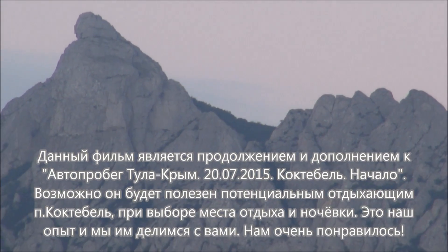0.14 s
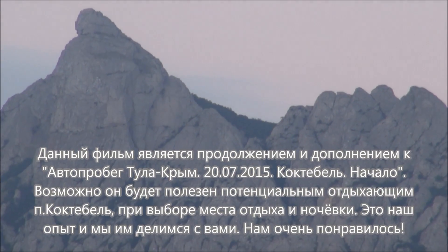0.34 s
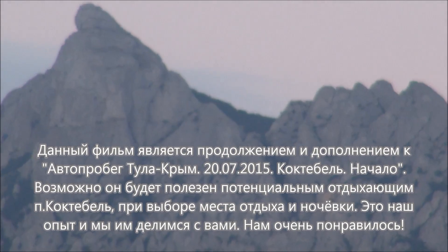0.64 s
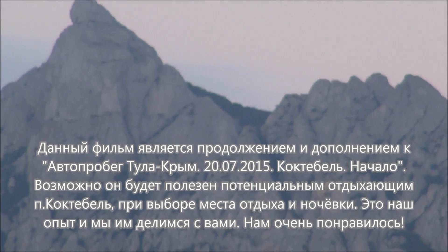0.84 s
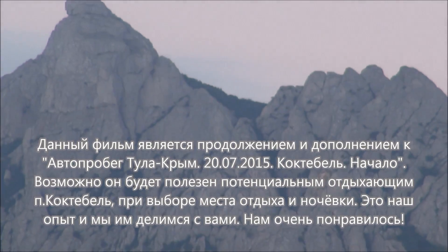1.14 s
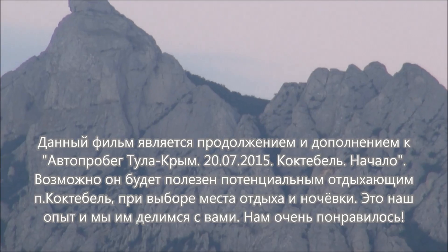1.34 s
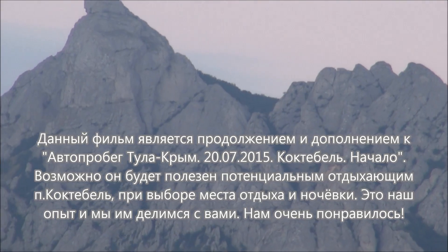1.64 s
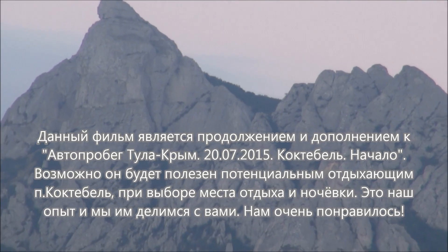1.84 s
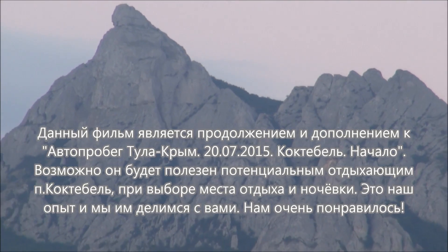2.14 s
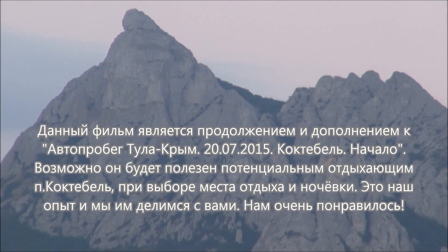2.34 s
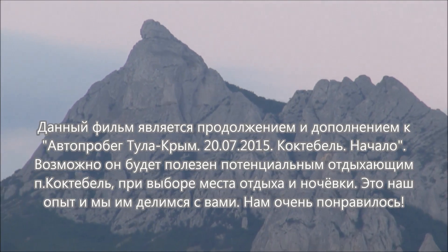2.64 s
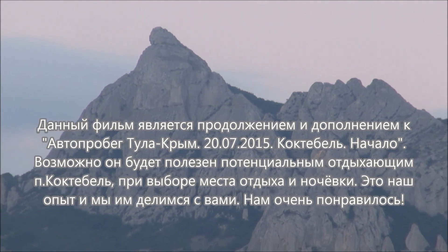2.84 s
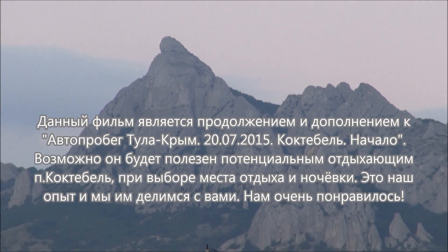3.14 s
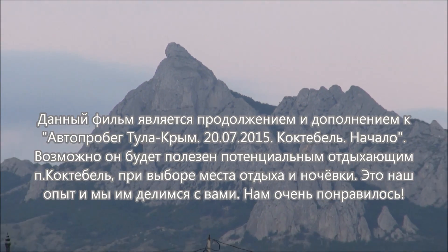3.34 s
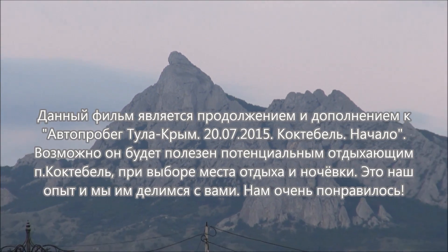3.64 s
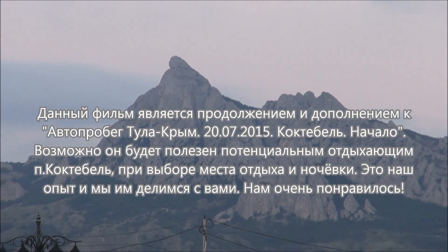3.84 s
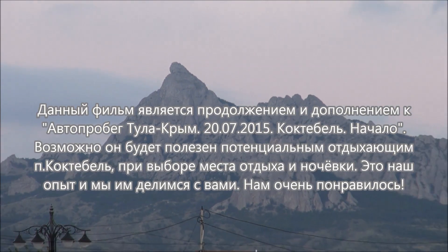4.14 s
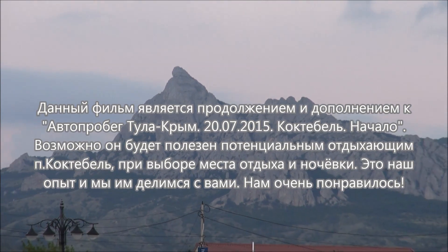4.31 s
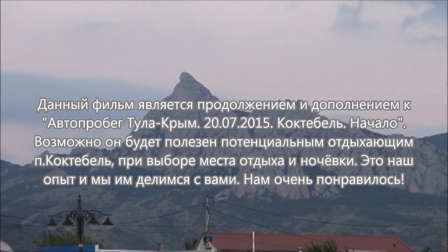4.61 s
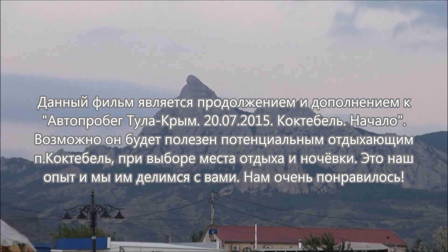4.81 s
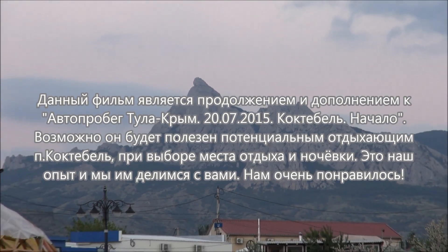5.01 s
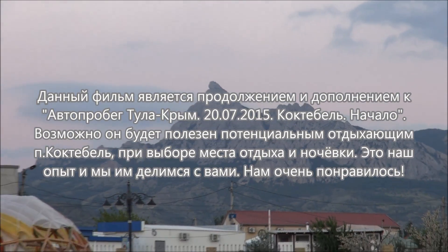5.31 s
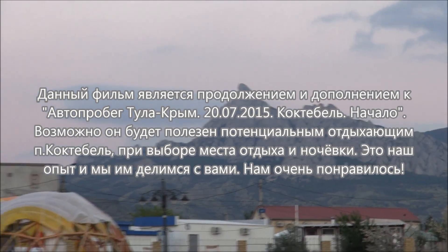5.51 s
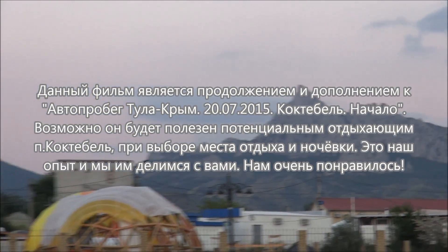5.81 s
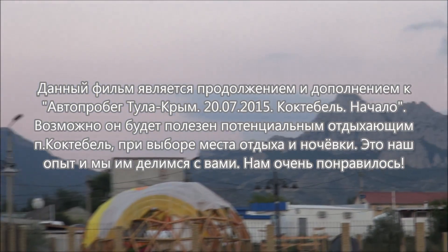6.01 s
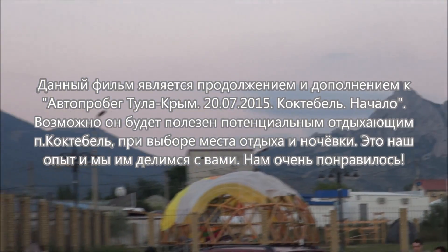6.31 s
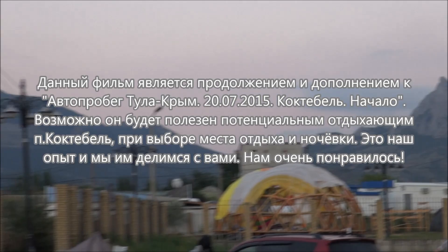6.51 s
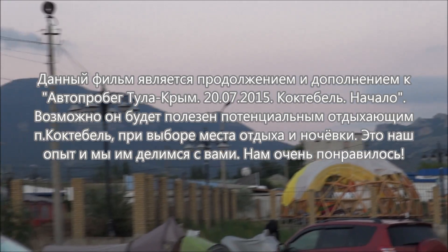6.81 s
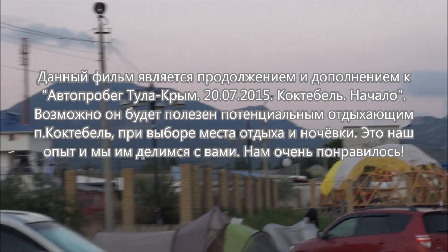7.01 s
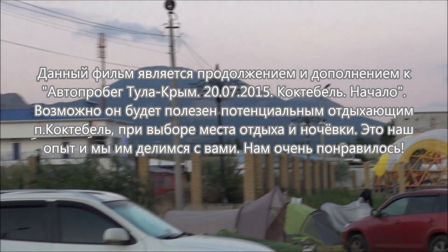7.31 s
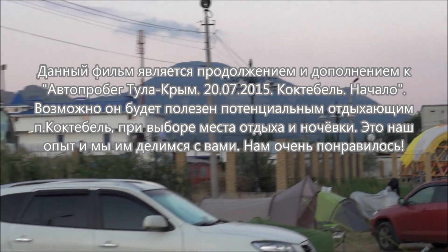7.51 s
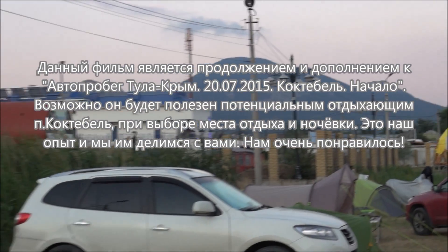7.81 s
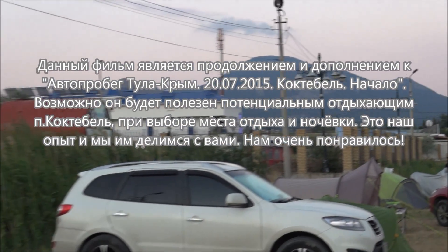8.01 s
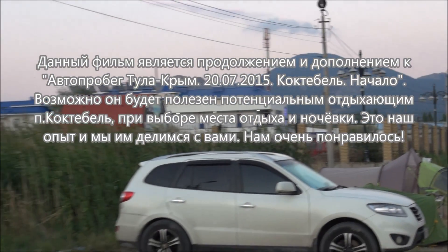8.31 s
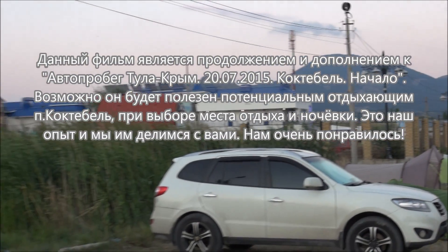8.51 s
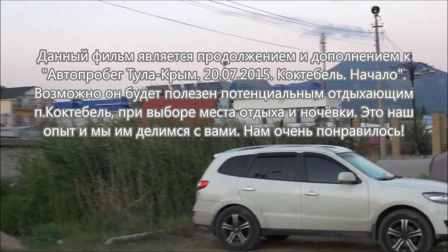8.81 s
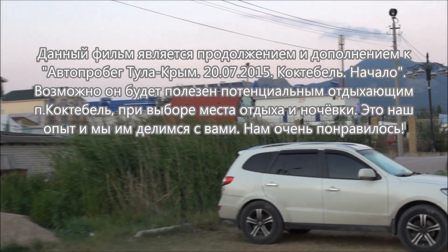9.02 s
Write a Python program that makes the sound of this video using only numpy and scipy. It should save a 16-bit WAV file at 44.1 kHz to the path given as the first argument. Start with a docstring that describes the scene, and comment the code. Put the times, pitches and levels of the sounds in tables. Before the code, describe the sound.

Lumpy low wind roar comes in broken bursts, then grows nearly continuous, with thin quick swallow calls and a distant twittering flock behind it.

```python
"""A lumpy low roar comes first: gusty wind over the two close ports of a small camera microphone at a camp.
The roar is noise shaped in half-octave bands, brighter as it grows louder; single eddies add
thumps and short bright rustles. A swallow whistles a four-note call near by, others chirp hooked notes,
and a far flock twitters, all blurred by scattered echoes. Underneath lies a smooth noise hiss
of surroundings and preamplifier that sinks after the strongest gusts and creeps back."""
import sys
import numpy as np
from scipy import signal
from scipy.fft import rfft, irfft, next_fast_len
from scipy.io import wavfile
from scipy.ndimage import uniform_filter1d, minimum_filter1d

SR = 44100
rng = np.random.default_rng(int(sys.argv[2]) if len(sys.argv) > 2 else 0)


def to_wav(s):
    """Save 16-bit WAV."""
    ch = np.atleast_2d(s).T  # columns
    pcm = np.round(np.clip(ch, -1, 1) * 32767)  # PCM
    wavfile.write(sys.argv[1], SR, pcm.astype(np.int16))


N = 403515


def from_db(db):
    """Decibels to amplitude gain."""
    return 10 ** (np.asarray(db) / 20)


def rms_one(x):
    """Scales a signal to an rms of 1."""
    return x / np.sqrt(np.mean(x ** 2) + 1e-20)


def in_time(rows):
    """Draws each value column of a timed table as a curve, sample by sample."""
    times_s, *columns = np.transpose(rows)
    return [np.interp(np.arange(N) / SR, times_s, column) for column in columns]


def at_hz(points, hz):
    """Reads a spectrum table on a log-frequency axis."""
    points_hz, values = np.transpose(points)
    return np.interp(np.log(hz), np.log(points_hz), values)


def drift(corner_hz):
    """Slow random wander of rms 1: noise at every 20th sample through two equal one-pole low-passes."""
    pole = np.exp(-2 * np.pi * corner_hz * 20 / SR)
    noise = rng.standard_normal(N // 20 + 4002)
    slow = signal.lfilter([1], [1, -2 * pole, pole * pole], noise)[4000:]  # drop the filter's start-up
    return np.interp(np.arange(N) / 20, np.arange(len(slow)), rms_one(slow))


def panned(x, pan_db):
    """Spreads a sound over two channels, the left louder than the right by pan_db."""
    return np.outer(from_db([pan_db / 2, -pan_db / 2]), x)


def coloured(x, points):
    """Tints the spectrum of x with a table and returns it with its frequency axis."""
    size = next_fast_len(N)
    hz = np.maximum(np.fft.rfftfreq(size, 1 / SR), 1)
    return rfft(x, size) * from_db(at_hz(points, hz)), hz


def to_time(spectrum):
    """Turns spectra back into sound of the scene's length."""
    return irfft(spectrum, next_fast_len(N))[..., :N]


# Level of the wind roar as heard, before flutter and band changes: time_s, roar_db
GUSTS = [(0.0, -42.5), (0.18, -33.5), (0.38, -49), (0.51, -23), (0.64, -30), (0.66, -33), (0.71, -37.5),
         (0.76, -30.5), (0.92, -40), (0.97, -32), (1.22, -53.5), (1.5, -54), (1.68, -28.5), (1.91, -71),
         (2.14, -65.5), (2.27, -24), (2.6, -39.5), (2.78, -32.5), (2.85, -51.5), (2.9, -33), (3.0, -24),
         (3.11, -37.5), (3.16, -30.5), (3.18, -50), (3.24, -33), (3.49, -53), (3.64, -27.5), (3.72, -39),
         (3.77, -19.5), (4.13, -28), (4.3, -39.5), (4.56, -21.5), (4.71, -22), (4.74, -21.5), (4.87, -28),
         (5.2, -20.5), (5.3, -26.5), (5.35, -25), (5.68, -28), (6.19, -21), (6.39, -28), (6.5, -26),
         (6.75, -34), (6.93, -25), (7.26, -35), (7.31, -25.5), (7.39, -39), (7.42, -32), (7.54, -24.5),
         (7.62, -30), (7.85, -27), (7.87, -37.5), (8.03, -41), (8.18, -30.5), (8.46, -31), (8.82, -27),
         (8.87, -39), (8.97, -31.5), (9.07, -25.5), (9.15, -32.5)]
USUAL_ROAR_DB = -25
FLUTTER_DB, FLUTTER_CORNER_HZ = 1.0, 16
MORE_FLUTTER_PER_DB = .12  # dB more flutter per dB that the roar is below usual


def gusts():
    """Follows the roar level with a random flutter that deepens as the roar falls below usual."""
    gust_db, = in_time(GUSTS)
    flutter_db = FLUTTER_DB + MORE_FLUTTER_PER_DB * np.maximum(USUAL_ROAR_DB - gust_db, 0)
    return gust_db + flutter_db * drift(FLUTTER_CORNER_HZ)


# Single eddies striking a port, levels before the trims below: time_s, peak_db, bright_edge_db
PUFFS = [(0.496, -13, -68), (0.589, -13.5, -40), (0.658, -11, -51), (2.226, -14.5, -47), (2.25, -8, -36),
         (2.284, -30, -42), (2.328, -8, -31), (2.372, -13.5, -53), (2.652, -37, -62), (2.74, -13.5, -62),
         (2.984, -17, -48), (3.137, -12.5, -54), (3.744, -36, -49), (3.765, -4, -40), (3.858, -21, -32),
         (3.936, -4.5, -39), (4.092, -16, -44), (4.515, -18, -53), (4.753, -29, -52), (5.199, -5, -49),
         (5.911, -14.5, -42), (6.031, -6, -34), (6.164, -16, -45), (6.199, -10, -32.5), (6.92, -22, -42),
         (7.319, -10, -53), (7.466, -30.5, -53), (7.83, -10.5, -64), (8.179, -13, -65), (8.991, -32, -45)]


def after_puffs(db, fade_s):
    """An envelope that jumps at each puff and fades exponentially; fade_s near zero leaves clicks."""
    strikes = np.zeros(N)
    strikes[[round(row[0] * SR) for row in PUFFS]] = from_db(db)
    return signal.lfilter([1], [1, -np.exp(-1 / (fade_s * SR))], strikes + 1e-18)


# Roar at usual brightness, rescaled as a whole: frequency_hz, density_db (per Hz)
ROAR = [(15, -68), (25, -53), (48, -26), (100, -10), (146, -4), (318, 1), (413, -2.5), (604, -8),
        (753, -14), (958, -19), (3000, -53), (3900, -66), (6600, -120)]
# What differs between the ports, against the shared roar: frequency_hz, level_db
ROAR_APART = [(30, -9), (100, -42), (300, -46), (800, -21.5), (2000, -44)]
# Share of the power that comes in lumps: frequency_hz, power_share (0 to 1)
LUMPY_SHARE = [(40, 0.78), (125, 0.41), (300, 0.79), (600, 0.89)]


def eddy_pressure(roar_db, lump_db, puff_s, puff_crest_db, slap_db):
    """Mixes lumpy and smooth turbulence; returns shared and differing spectra with their Hz axis."""
    peak_db = np.array(PUFFS)[:, 1]
    # Dividing by the roar gain keeps puffs independent of the roar level applied later.
    puffs = after_puffs(peak_db - puff_crest_db, puff_s) / from_db(roar_db)
    lumps = rms_one(from_db(lump_db * drift(50.0)))
    force = np.hypot(lumps, puffs)  # puffs add their power to the gust's
    lumpy, apart, smooth = rng.standard_normal((3, N))
    # Each puff opens with one pressure kick of random sign.
    kicks = after_puffs(peak_db + slap_db, 1e-6) / from_db(roar_db) * np.sign(apart)
    noises = np.array([lumpy * force + kicks, apart * force, smooth])
    (lumpy, apart, smooth), hz = coloured(noises, ROAR)
    share = np.clip(at_hz(LUMPY_SHARE, hz), 0, 1)
    shared = np.sqrt(share) * lumpy + np.sqrt(1 - share) * smooth
    return np.array([shared, from_db(at_hz(ROAR_APART, hz)) * apart]), hz


# Slow change of the upper roar beyond the level rule: time_s, brightness_db
BRIGHTNESS = [(0, -7.5), (.45, -5), (.8, -2), (1.2, -3), (1.7, -8.5), (2.3, 5), (2.6, -1.5), (3.0, -4.5),
              (3.2, -5.5), (3.8, -1), (4.8, -3), (5.6, -1.5), (6.3, 3), (6.8, 2.5), (7.2, 3.5), (7.9, 1.5),
              (8.3, 3), (9.15, 2)]
BRIGHTER_PER_DB = 0.4041  # dB of brightness per dB of roar above usual
# How far each pitch region follows the brightness: frequency_hz, share (dB per dB)
BRIGHTENING = [(30, -1), (100, -0.87), (300, 0.12), (800, 1.21), (1600, 1.44), (3000, 0.57)]
# The weight of the roar's lows changes slowly: time_s, lows_db
LOWS = [(0, -10), (.7, -2), (1.3, -1), (1.9, -3), (2.3, 22), (2.8, -6.5), (3.3, 1), (4.8, -6.5),
        (6.1, -0.5), (6.7, -6.5), (8.2, -2.5), (9.15, -6)]
# How far each pitch region follows that weight: frequency_hz, share (dB per dB)
LOWS_SHARE = [(60, 0.7), (120, 0.63), (250, 0.014)]
# Stereo lean of the shared roar: frequency_hz, left_minus_right_db
ROAR_BALANCE = [(40, -.6), (170, -1.2), (300, -2.9), (480, -4.4), (700, -1.3), (1000, 1.3), (2000, .1)]


def wind(lump_db, own_db, puff_s, puff_crest_db, slap_db):
    """Plays eddy pressure in half octaves that follow level, brightness, low weight and their own wander."""
    roar_db = gusts()
    brightness_db = in_time(BRIGHTNESS)[0] + BRIGHTER_PER_DB * (roar_db - USUAL_ROAR_DB)
    lows_db, = in_time(LOWS)
    spectra, hz = eddy_pressure(roar_db, lump_db, puff_s, puff_crest_db, slap_db)
    out = np.zeros((2, N))
    for centre_hz in 25 * 2 ** np.arange(0, 8, .5):
        octaves_off = np.log2(hz / centre_hz)
        overlap = np.cos(np.pi * np.clip(octaves_off, -.5, .5)) ** 2  # neighbours add up to one
        shared, apart = to_time(spectra * overlap)
        band = panned(shared, at_hz(ROAR_BALANCE, centre_hz)) + np.outer([1, -1], apart)
        change_db = at_hz(BRIGHTENING, centre_hz) * brightness_db
        change_db += at_hz(LOWS_SHARE, centre_hz) * lows_db
        out += band * from_db(roar_db + change_db + own_db * drift(3.8))
    usual_rms = np.sqrt(np.mean(from_db(at_hz(ROAR, hz)) ** 2))
    return out / usual_rms


# Colour of a puff's bright edge, rescaled as a whole: frequency_hz, density_db (per Hz)
EDGE = [(700, -21), (1300, 10.5), (2000, -1), (3200, -15.5), (5000, -24), (8000, -52)]


def puff_edges(fade_s, gain_db):
    """Each puff tears a short bright noise rustle off the rim of the port."""
    spectrum, _ = coloured(rng.standard_normal(N), EDGE)
    rustle = rms_one(to_time(spectrum))
    edge_db = np.array(PUFFS)[:, 2] + gain_db
    softened = uniform_filter1d(after_puffs(edge_db, fade_s), size=130)  # about 3 ms
    return panned(rustle * softened, .3)


# Second partial against the first, before a note's own offset: pitch_hz, level_db
OCTAVE = [(1600, 16), (2300, 3.5), (2900, -1.5), (3300, -19), (3800, -21), (5000, -30)]


def whistle(rows, octave_db=0):
    """A gliding sine along (time_s, pitch_hz, level_db) rows, with its octave and rounded ends."""
    times_s, pitches_hz, levels_db = np.transpose(rows)
    t = np.arange(times_s[0], times_s[-1], 1 / SR)
    pitch_hz = uniform_filter1d(np.interp(t, times_s, pitches_hz), size=25)
    phase = 2 * np.pi * np.cumsum(pitch_hz) / SR
    octave_gain = from_db(at_hz(OCTAVE, pitch_hz) + octave_db)
    tone = np.sin(phase) + octave_gain * np.sin(2 * phase)
    level = from_db(np.interp(t, times_s, levels_db))
    return tone * level * signal.windows.tukey(len(t), .2)


def add(out, sound, start_s, level_db, pan_db):
    """Mixes a sound in at its start time."""
    i = round(start_s * SR)
    out[:, i:i + len(sound)] += from_db(level_db) * panned(sound, pan_db)[:, :N - i]


SHOULDER_S, DIP_S, TOP_S, END_S = .0075, .0098, .013, .0172  # times within a note
DIP_SHARE, END_SHARE = .3, .15  # of the climb to the shoulder, of the whole span
START_DB, SHOULDER_DB, END_DB = -11, -3, -9  # against the top


def call_note(start_hz, shoulder_hz, top_hz):
    """A whistle that climbs to a shoulder, sags a little, flicks to the top and drops."""
    dip_hz = shoulder_hz - DIP_SHARE * (shoulder_hz - start_hz)
    end_hz = start_hz + END_SHARE * (top_hz - start_hz)
    return whistle([(0, start_hz, START_DB),
                    (SHOULDER_S, shoulder_hz, SHOULDER_DB),
                    (DIP_S, dip_hz, SHOULDER_DB),
                    (TOP_S, top_hz, 0),
                    (END_S, end_hz, END_DB)])


# The near swallow's four notes: start_hz, shoulder_hz, top_hz, level_db (against the call)
CALL = [(1700, 2450, 3050, -12), (2650, 3600, 5100, 0), (2800, 4500, 5300, 0), (2850, 4150, 5150, -6)]
# When the near swallow calls: start_s, level_db
CALLS_AT = [(3.2587, -38.5), (5.6642, -43), (7.1265, -42), (1.256, -52)]
NOTE_EVERY_S, NEAR_PAN_DB = .0282, 2


def near_swallow():
    """Sings the call as four evenly spaced whistled notes."""
    out = np.zeros((2, N))
    for start_s, call_db in CALLS_AT:
        for k, (*pitches_hz, note_db) in enumerate(CALL):
            add(out, call_note(*pitches_hz), start_s + k * NOTE_EVERY_S, call_db + note_db, NEAR_PAN_DB)
    return out


def hook(start_hz, top_hz, length_s):
    """A purer whistle that climbs, faster at the end, and drops back quickly."""
    span_hz = top_hz - start_hz
    return whistle([(0, start_hz, -11),
                    (0.462 * length_s, start_hz + 0.396 * span_hz, -2),
                    (0.704 * length_s, top_hz, -1.5),
                    (length_s, start_hz + 0.25 * span_hz, -10.5)], octave_db=-13)


# Hooked notes of other swallows: start_s, level_db, start_hz, top_hz, length_s
NOTES = [ (0.442, -49.5, 2470, 5630, 0.024), (0.471, -47, 2790, 5400, 0.017),
         (0.507, -47, 3000, 4800, 0.0079), (1.734, -49, 4970, 6370, 0.015), (1.75, -44, 4850, 5900, 0.013),
         (1.81, -47, 4200, 6900, .016), (1.818, -52, 4170, 6800, 0.017), (1.832, -47, 4730, 5950, .011),
         (2.602, -57, 2020, 2310, .035), (2.77, -55, 5200, 6400, 0.013), (2.777, -53, 3200, 3800, 0.011),
         (2.793, -51, 3270, 3800, 0.011), (2.802, -48, 3900, 5270, 0.011), (3.88, -57, 5200, 5500, 0.033),
         (8.03, -61, 2780, 5130, .016), (8.083, -57, 2950, 5200, .016), (8.111, -58, 3750, 5300, 0.016),
         (8.58, -53, 3300, 4700, 0.02), (8.614, -55, 2800, 5100, .019), (8.870, -56, 3540, 4730, .017),
         (8.898, -47, 2660, 5230, 0.014), (8.916, -50, 2870, 5300, 0.023), (8.982, -55, 2480, 4470, 0.02),
         (9.012, -64, 2870, 5240, 0.014), (9.111, -49, 3600, 5230, 0.011), (9.133, -50, 3840, 5040, .012), ]
FAR_PAN_DB = 2


def other_swallows():
    """Places each hooked note of the other swallows at its time."""
    out = np.zeros((2, N))
    for start_s, level_db, start_hz, top_hz, length_s in NOTES:
        add(out, hook(start_hz, top_hz, length_s), start_s, level_db, FAR_PAN_DB)
    return out


# The far flock's twitter swells and fades: time_s, note_level_db
FLOCK = [(0, -69), (1.15, -67), (1.3, -67), (1.38, -68), (2.2, -74), (2.6, -75), (2.85, -77), (4.4, -69.5),
         (5.0, -75), (5.6, -71), (6.3, -70.5), (7.3, -79), (7.6, -72.5), (8.1, -65.5), (8.2, -77),
         (8.9, -68), (9.15, -70)]
FLOCK_NOTES_PER_S = 240


def far_flock():
    """Scatters hooked notes at random times, pitches, lengths and pans under one swelling level."""
    out = np.zeros((2, N))
    for when, low, high, long, side in rng.random((round(FLOCK_NOTES_PER_S * N / SR), 5)):
        note = hook(2500 + 1400 * low, 4100 + 1300 * high, 0.01 + 0.0117 * long)
        add(out, note, when * (N - 1) / SR, 0, FAR_PAN_DB + 4.0 * (side - .5))
    return out * from_db(in_time(FLOCK)[0])


NEAR_SCATTER_DB, FAR_SCATTER_DB, SCATTER_T60_S = -11.5, -8, .18


def scattered(sound):
    """Sound thrown back by ground, tents and walls: decaying noise echoes, mostly alike at both ports."""
    t = np.arange(0, SCATTER_T60_S, 1 / SR)
    decay = from_db(-60 * t / SCATTER_T60_S) * (t > .004)  # nothing returns in the first 4 ms
    echoes = rng.standard_normal((3, len(t))) * decay
    echoes = echoes[0] + 0.37 * echoes[1:]
    echoes /= np.linalg.norm(echoes, axis=1, keepdims=True)
    return signal.fftconvolve(sound, echoes, axes=1)[:, :N]


def swallows():
    """Roughens the birds as moving air does, more so from afar, and adds their echoes."""
    near = near_swallow() * from_db(1.5 * drift(150.0))
    far = (other_swallows() + far_flock()) * from_db(3.9 * drift(140.0))
    return near + far + scattered(from_db(NEAR_SCATTER_DB) * near + from_db(FAR_SCATTER_DB) * far)


# The hiss sinks after the strongest gusts and creeps back: time_s, level_db
HISS_LEVEL = [(0, -56), (.6, -53), (2.15, -52), (2.4, -57.5), (3.8, -54), (4.0, -57), (5.3, -59),
              (6.12, -57.5), (6.3, -62.5), (6.9, -62.5), (8.7, -57.5), (9.15, -58)]
# Colour of the hiss, rescaled as a whole: frequency_hz, density_db (per Hz)
HISS = [(60, -2.5), (150, -1), (500, 2), (1000, -1), (2200, -4.5), (4900, -8), (6500, -11.5), (10000, -17),
        (12700, -15), (15500, -18)]
# Difference between the ports: frequency_hz, side_against_mid_db
HISS_APART = [(1000, -11), (4000, -40), (6000, -5), (9000, -11.5), (11000, -11), (12500, -40.5)]
# Stereo lean of the mid: frequency_hz, left_minus_right_db
HISS_BALANCE = [(300, -4), (1000, 0), (2500, 1.45), (5500, -0.5), (9000, 1.2), (11500, 0)]


def hiss():
    """Smooth noise of surroundings and preamplifier, built from a shared mid and a coloured side."""
    level_db, = in_time(HISS_LEVEL)
    (mid, side), hz = coloured(rng.standard_normal((2, N)), HISS)
    side = side * from_db(at_hz(HISS_APART, hz))
    lean = from_db(at_hz(HISS_BALANCE, hz) / 2)
    ports = to_time(np.array([mid * lean + side, mid / lean - side]))
    return from_db(level_db) * rms_one(ports)


def scene():
    """Sums the wind, its bright edges, the birds and the hiss."""
    roar = wind(lump_db=3.2, own_db=.9, puff_s=0.011, puff_crest_db=9, slap_db=9)
    return roar + puff_edges(fade_s=0.023, gain_db=-5.0) + swallows() + hiss()


LIMIT, CUTOFF_HZ = .335, 15640  # limiter ceiling as amplitude, before the low-pass


def record(dry):
    """A fast limiter turns both channels down around peaks, then a steep low-pass cuts the top."""
    wanted_gain = np.minimum(1, LIMIT / (np.abs(dry).max(axis=0) + 1e-9))
    gain = uniform_filter1d(minimum_filter1d(wanted_gain, size=441), size=441)  # 10 ms windows
    low_pass = signal.ellip(12, .3, 70, CUTOFF_HZ, fs=SR, output="sos")
    return signal.sosfilt(low_pass, dry * gain)


dry = scene()
out = record(dry)
to_wav(out)
```